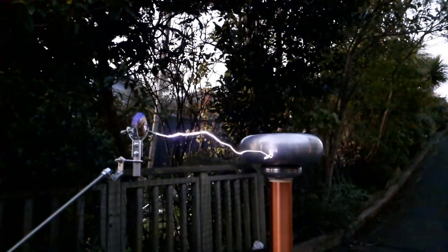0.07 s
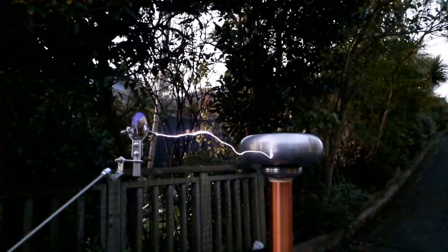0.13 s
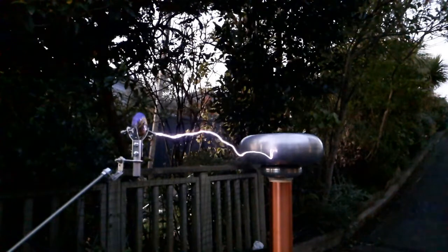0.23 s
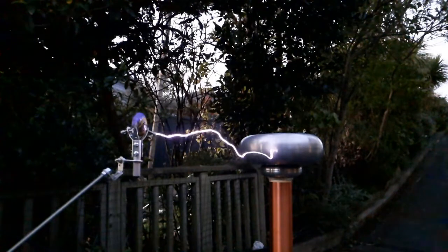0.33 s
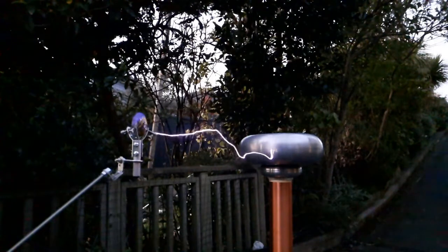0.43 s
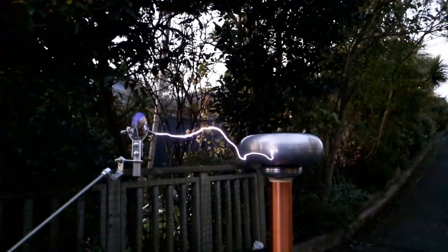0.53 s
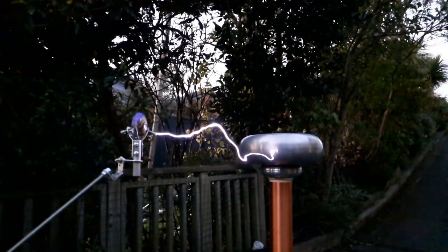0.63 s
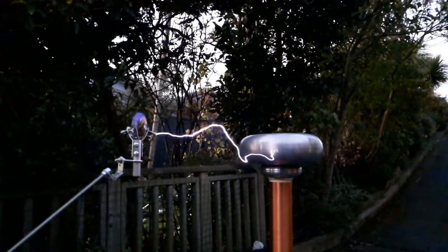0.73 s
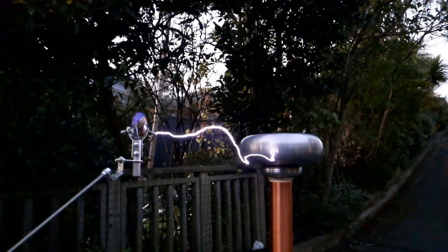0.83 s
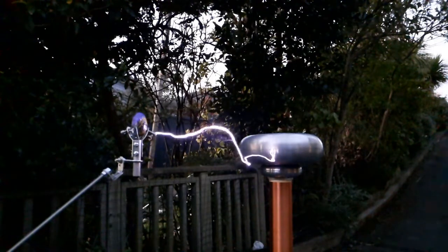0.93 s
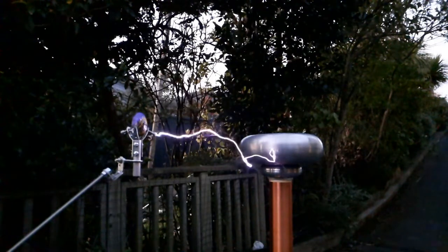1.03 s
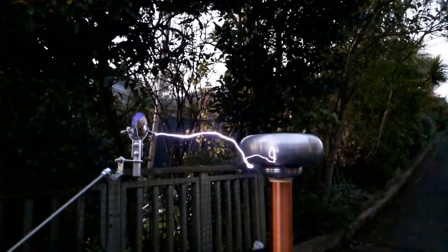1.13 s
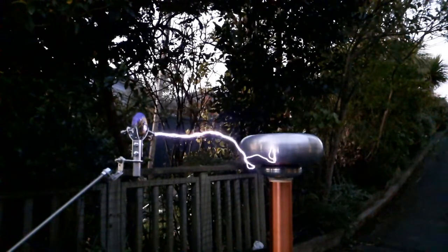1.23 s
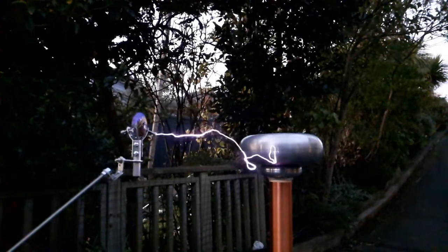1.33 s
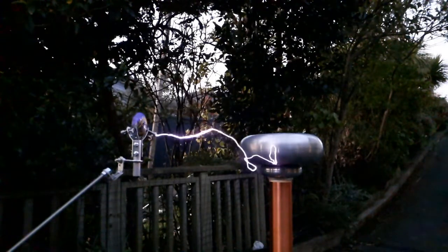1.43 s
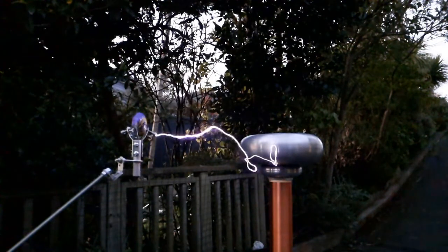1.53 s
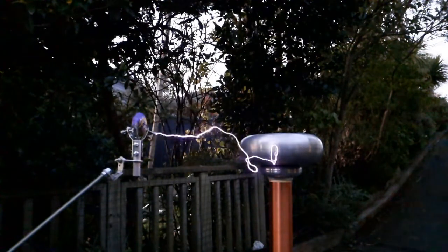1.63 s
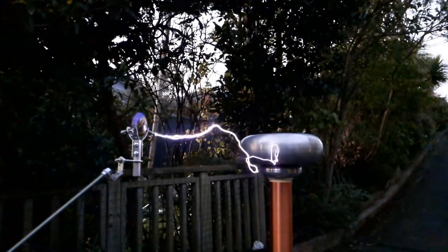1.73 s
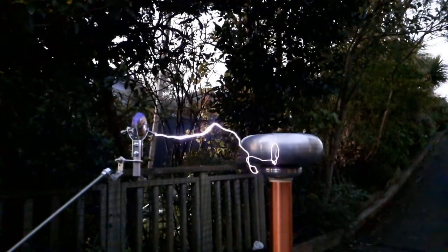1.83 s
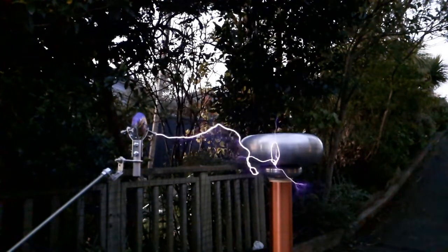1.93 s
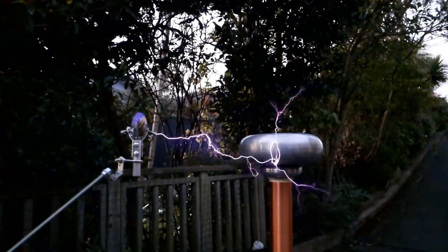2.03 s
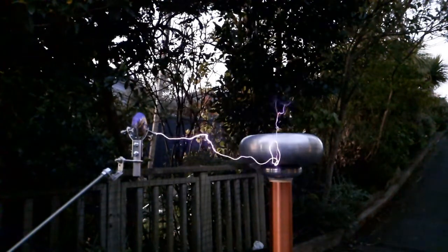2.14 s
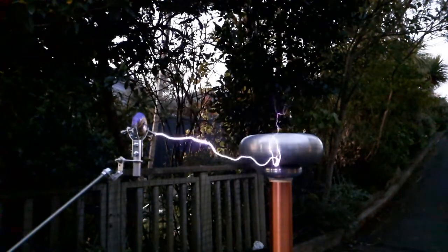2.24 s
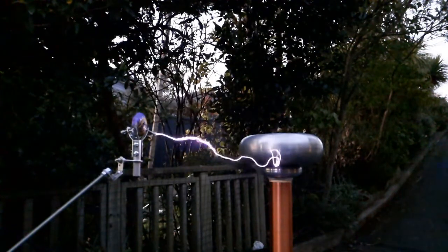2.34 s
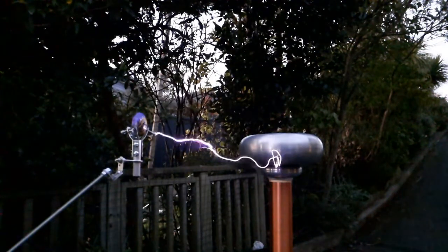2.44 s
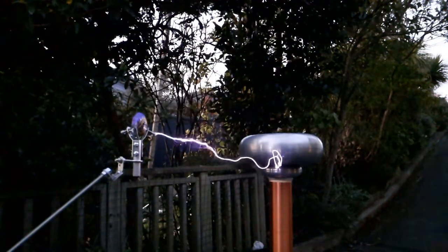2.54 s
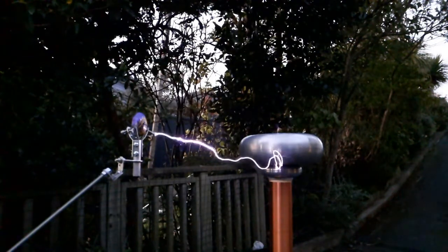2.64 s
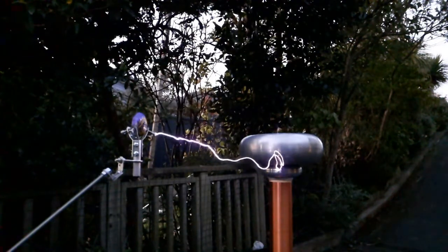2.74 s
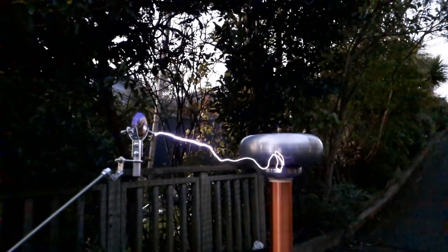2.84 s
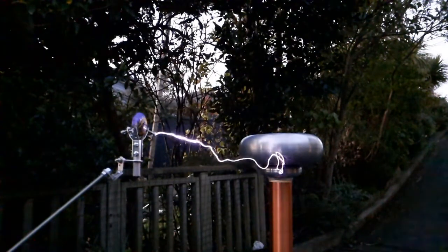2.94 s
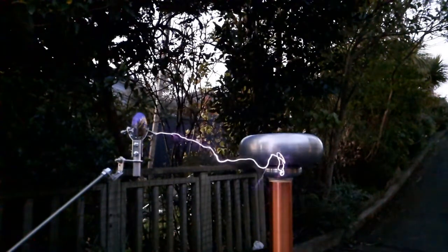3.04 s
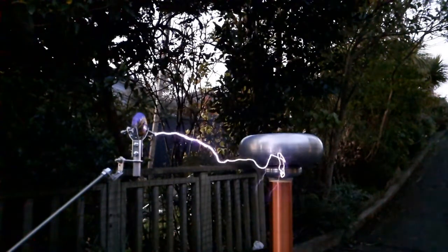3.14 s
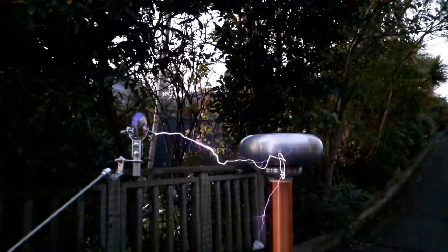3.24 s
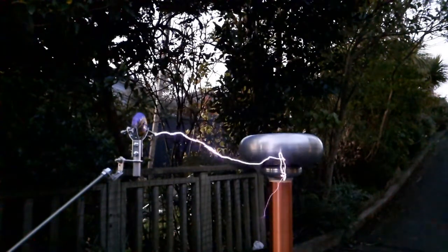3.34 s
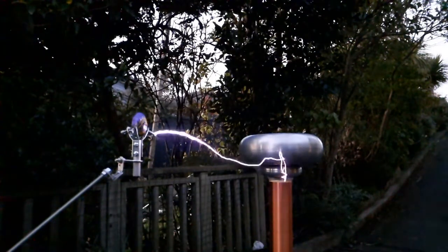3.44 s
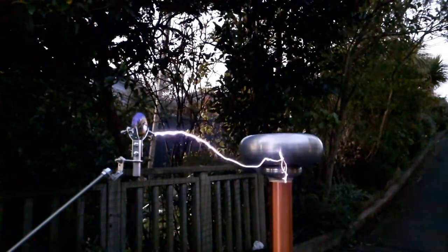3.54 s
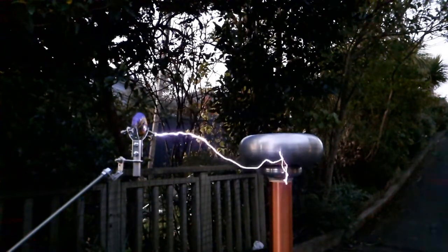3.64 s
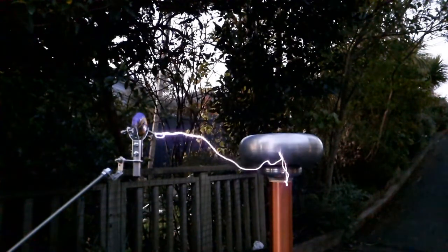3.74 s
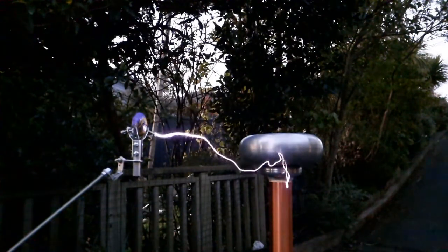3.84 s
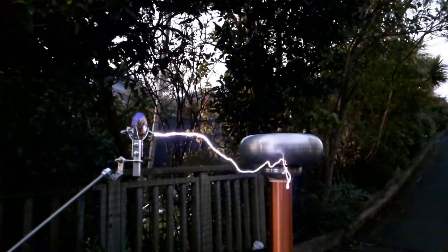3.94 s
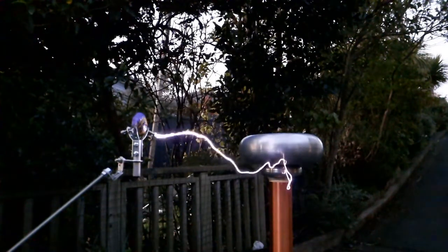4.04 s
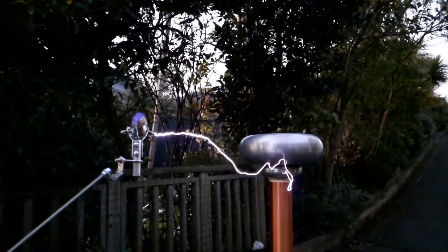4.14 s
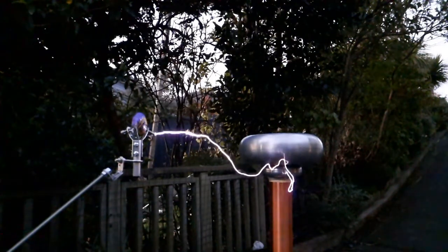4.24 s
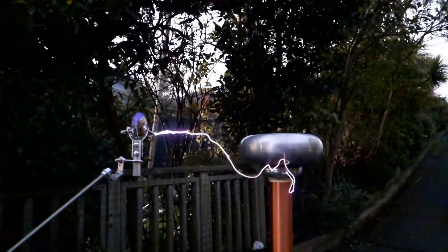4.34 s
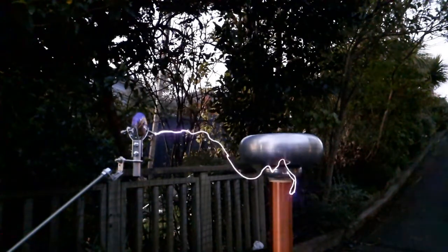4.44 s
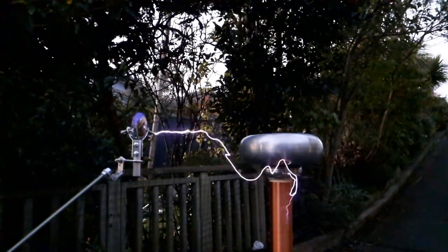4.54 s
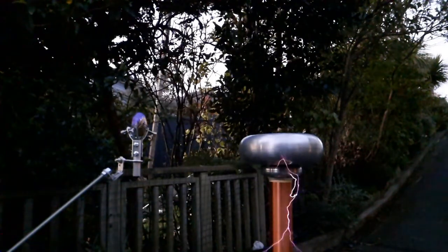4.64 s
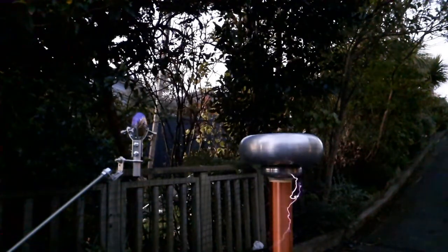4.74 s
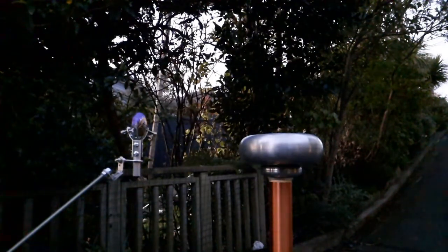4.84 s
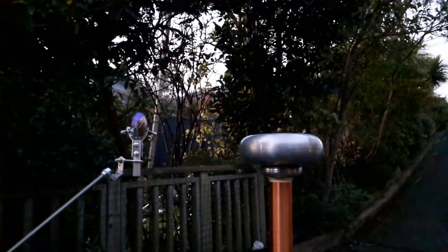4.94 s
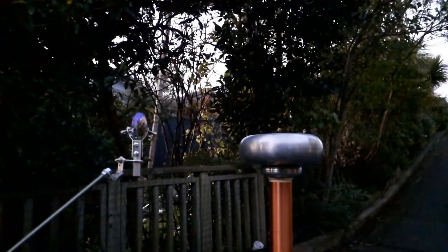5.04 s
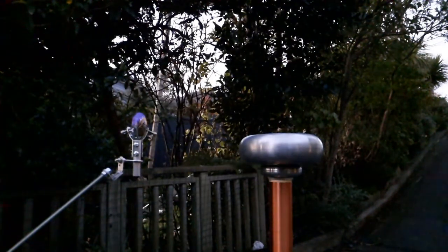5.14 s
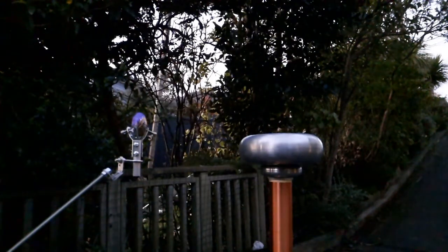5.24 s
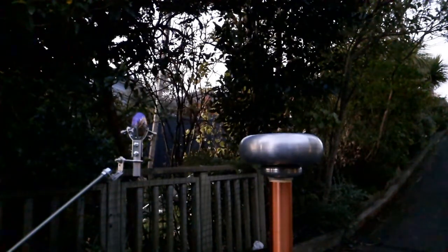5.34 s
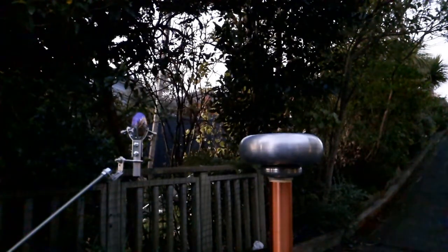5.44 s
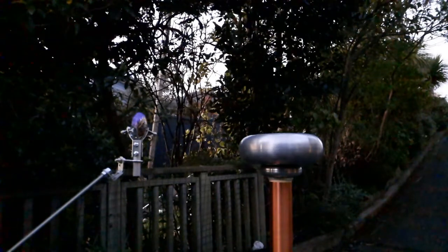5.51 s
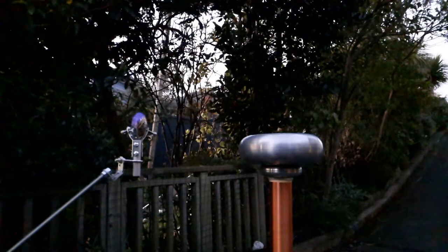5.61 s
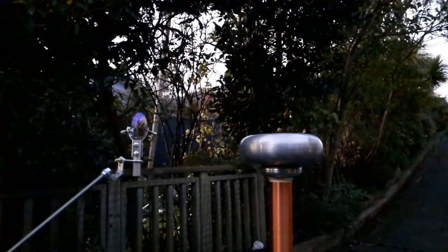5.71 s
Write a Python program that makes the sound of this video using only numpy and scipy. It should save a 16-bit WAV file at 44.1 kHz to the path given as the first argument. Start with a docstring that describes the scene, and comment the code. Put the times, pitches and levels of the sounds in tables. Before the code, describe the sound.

A loud, gritty, low electric buzz of rapid even crackles in slowed playback rattles outdoors, then dies near five seconds into a faint echoing tail.

```python
"""A high-voltage coil in a garden, heard in slow motion, over a steady outdoor murmur.
From the start, near-even sparks crack as bursts of ticks; each one shoves two microphone capsules.
Meanwhile a metal part swells near 1 kHz, arc jumps knock, and echoes hum on multiples of the spark rate.
The arc dies away by 4.95 s and the garden echoes on.
The slowed playback holds each sample, so mirror images of the sound fill the treble."""
import sys
import numpy as np
from scipy import signal
from scipy.fft import rfft, irfft, next_fast_len
from scipy.io import wavfile
from scipy.ndimage import map_coordinates

SR = 44100
rng = np.random.default_rng(int(sys.argv[2]) if len(sys.argv) > 2 else 0)


def persist_wave(psi):
    """Save psi, clipped to +-1, as 16-bit WAV."""
    counts = np.round(np.clip(psi, -1, 1) * 32767).astype(np.int16)
    wavfile.write(sys.argv[1], SR, np.atleast_2d(counts).T)


N = 254456
SPARK_HZ, FIRST_S, OFF_S = 53.6144, 0.0088, 4.95


def undb(db):
    """Decibels to amplitude factor."""
    return 10 ** (np.asarray(db) / 20)


def colour(x, points):
    """Shapes the spectrum along (freq_hz, gain_db) points, log-frequency interpolation."""
    n = next_fast_len(x.shape[-1] + 4096)
    freq_hz, gain_db = np.transpose(points)
    bin_hz = np.arange(n // 2 + 1) * SR / n
    gain = undb(np.interp(np.log(bin_hz + 1), np.log(freq_hz), gain_db))
    return irfft(rfft(x, n) * gain, n)[..., :x.shape[-1]]


def ring(x, freq_hz, t60_s):
    """One exponentially decaying mode driven by x: a complex one-pole resonator."""
    pole = np.exp(2j * np.pi * freq_hz / SR - np.log(1000) / (t60_s * SR))
    return signal.lfilter([1], [1, -pole], x).imag


def bump(rise_ms, fall_ms, size=1400):
    """Quick rise and exponential fall, peak 1."""
    ms = np.arange(size) * 1000 / SR
    y = (1 - np.exp(-ms / rise_ms)) ** 2 * np.exp(-ms / fall_ms)
    return y / y.max()


def clicks(times_s, sizes):
    """A click of the given size at each time."""
    return np.bincount(np.clip(times_s * SR, 0, N - 1).astype(int), sizes, N)


def overlay(times_s, bursts):
    """Sums one burst per row, each starting at its own time."""
    where = (times_s * SR).astype(int)[:, None] + np.arange(bursts.shape[1])
    return np.bincount(where.ravel(), bursts.ravel(), N)[:N]


def drift(shape, keep, order=2):
    """Random rows of spread 1, each correlated by `keep` with the row `order` places before."""
    fresh = rng.standard_normal((shape[0] + 60,) + shape[1:])
    feedback = np.r_[1, np.zeros(order - 1), -keep]
    rows = signal.lfilter([np.sqrt(1 - keep ** 2)], feedback, fresh, axis=0)
    return rows[60:]  # drop the settling rows


# Spectral shape of the quiet garden: freq_hz, relative_density_db
AIR_SPECTRUM = [(35, -40), (60, -24), (123, -20), (152, -10), (296, -19), (648, -15.5), (1810, -19.5),
                (2950, -14), (3840, -49), (6490, -120)]
AIR_RMS_DB = -51.5


def air():
    """Steady outdoor murmur: coloured noise, independent at each capsule."""
    x = colour(rng.standard_normal((2, N)), AIR_SPECTRUM)
    return undb(AIR_RMS_DB) * x / np.sqrt(np.mean(x ** 2))


# Colour of the quick echoes: freq_hz, gain_db
NEAR_ECHO_COLOUR = [(40, -24), (160, -16), (300, -15), (500, -14), (750, -9), (1000, -2.5), (1300, -0.5),
                    (2300, -7), (2700, -5.5), (2950, -2.5)]
# Colour of the long echoes: freq_hz, gain_db
FAR_ECHO_COLOUR = [(40, -36), (160, -25), (300, -9), (500, -4.5), (750, 6), (1000, 7.5), (1300, 8),
                   (2300, -20), (2950, -14)]
NEAR_T60_S, FAR_T60_S = 1.15, 3.2


def garden(x):
    """Fence and hedges answer quickly, far walls and trees leave a faint long tail: noise convolution."""
    t = np.arange(int(1.5 * SR)) / SR
    near = undb(-37 - 60 * t / NEAR_T60_S)
    far = undb(-51.5 - 60 * t / FAR_T60_S)
    noise = rng.standard_normal(len(t)) * (1 - np.exp(-t / 0.0033))
    tail = colour(noise * near, NEAR_ECHO_COLOUR) + colour(noise * far, FAR_ECHO_COLOUR)
    earlier = x[:int(30 * SR / SPARK_HZ)]  # 30 spark periods still echoing at the start
    return signal.fftconvolve(np.r_[earlier, x], tail)[len(earlier):len(earlier) + N]


# Echo pile-up on multiples of the spark rate, before beat size and swell:
# multiple, level_db, t60_s, arrival_delay_s
HUM_PARTIALS = [(1, -61, 2.4, 0.33), (2, -55, 1, 0.66), (3, -45.5, 0.44, 0.), (4, -49, 1.5, 0.017),
                (5, -43.5, 1.73, 0.041), (6, -55, 1.2, 0.31), (7, -44.5, 1.1, 0.25), (8, -47, 0.9, 0.37),
                (9, -55.5, 1.8, 0), (10, -58.5, 1.2, 0.36), (11, -67, 1.9, 0.48)]
HUM_SWELL_DB, HUM_WAVER_RAD = 3, 0.5  # spreads
HUM_RIGHT_LAG_S = 0.004


def hum(times_s, sizes, side):
    """Echoes of regular pushes sum to harmonics that arrive late, waver and die slowly; later on the right."""
    grid_s = np.arange(int(N / SR * SPARK_HZ) + 2) / SPARK_HZ
    waver = drift((len(grid_s), len(HUM_PARTIALS), 2), 0.82, order=1).T
    t = np.arange(N) / SR
    late_s = t - FIRST_S - HUM_RIGHT_LAG_S * side
    out = 0
    for (multiple, level_db, t60_s, delay_s), swell, turn in zip(HUM_PARTIALS, *waver):
        keep = 1000 ** (-1 / (t60_s * SPARK_HZ))
        fed = np.interp(grid_s - delay_s, times_s, sizes, right=0)
        stored = signal.lfilter([1 - keep], [1, -keep], fed, zi=[keep * fed[0]])[0]
        level = stored * undb(level_db + HUM_SWELL_DB * swell) * np.exp(1j * HUM_WAVER_RAD * turn)
        carrier = np.exp(2j * np.pi * round(multiple) * SPARK_HZ * late_s)
        out = out + (np.interp(t, grid_s, level) * carrier).imag
    return out


# Spells of strong ring near 1 kHz, level before spark strength and scatter:
# start_s, end_s, first_hz, last_hz, level_db
RING_SPELLS = [(0, 0.362, 1065, 1100, -25), (0.43, 0.894, 1064, 1075, -25.5),
               (0.956, 1.85, 1071, 1075, -21), (3.44, 3.65, 1008, 1046, -23.5),
               (3.857, 3.964, 1088, 1060, -26), (4.09, 4.607, 1068, 1106, -20)]
RING_REST_DB, RING_FADE_DB_PER_S = -50, 19  # floor at strength 0 dB; fade outside a spell


def metal(times_s, arc_db, slip_s, side):
    """A metal part near 1 kHz swells and fades after each spark, with random level and timing."""
    start_s, end_s, first_hz, last_hz, level_db = np.transpose(RING_SPELLS)
    now_s = times_s[:, None]
    pitch_hz = first_hz + (last_hz - first_hz) * np.clip((now_s - start_s) / (end_s - start_s), 0, 1)
    away_s = np.maximum(0, np.maximum(start_s - now_s, now_s - end_s))
    spell_db = level_db - RING_FADE_DB_PER_S * away_s
    tone_db = np.maximum(spell_db.max(axis=1) + np.minimum(arc_db, 0), RING_REST_DB + arc_db)
    chance = rng.standard_normal((len(times_s), 2)).T
    onset_s = times_s + 0.0012 * side + 4e-5 * chance[0] + slip_s
    env = bump(2.2, 4.8)
    t = np.arange(len(env)) / SR
    loudest_hz = pitch_hz[np.arange(len(times_s)), spell_db.argmax(axis=1)]
    phase = 2 * np.pi * loudest_hz[:, None] * t
    # second mode about an octave up
    tone = env * np.sin(phase) + undb(-3.5) * bump(1.0, 10.3) * np.sin(2.1 * phase)
    scatter_db = 1.3 * chance[1]
    return overlay(onset_s, undb(tone_db + scatter_db)[:, None] * tone)


# Arc jumps to a new path, level at the right capsule before JUMP_GAIN_DB:
# time_s, level_db, pitch_hz, left_minus_right_db
ARC_JUMPS = [(0.026, -28, 313, 11), (0.045, -23, 353, 0.0), (0.063, -21, 444, -10), (0.101, -23, 307, 3),
             (0.12, -25, 369, 8), (0.157, -19, 480, -2.0), (0.215, -23, 374, -11), (0.232, -26, 460, 0.0),
             (0.605, -27, 308, -0.5), (0.792, -21, 417, 2), (0.903, -20, 441, -2), (0.923, -18, 790, 1.0),
             (1.145, -28, 431, 1), (1.183, -21, 439, 2.0), (1.557, -17, 423, -7), (1.67, -23, 570, -13),
             (1.686, -20.5, 420, -4), (1.706, -23, 430, 3), (1.742, -18, 444, 4), (2.078, -26, 443, 7),
             (2.097, -18, 740, -1.0), (2.267, -19, 396, -3.0), (2.283, -16, 724, 5), (2.304, -21, 624, -9),
             (2.321, -13.5, 439, -1), (2.414, -20.5, 314, 3), (2.452, -17, 725, -4), (2.527, -26, 347, 2),
             (2.601, -19, 510, -0.5), (2.825, -20, 327, 6), (3.05, -24, 320, -1.0), (3.106, -27, 330, -1.5),
             (3.197, -25, 305, -4), (3.405, -20, 600, 0.5), (3.424, -21, 363, 4), (3.443, -18, 336, 0),
             (3.458, -29, 487, -3), (3.571, -17.5, 592, 0), (3.61, -25, 482, -6), (3.685, -26, 455, -1),
             (3.701, -23, 480, 4), (3.738, -24, 298, -2.0), (3.758, -21, 328, 1), (3.775, -19, 398, 3),
             (3.813, -24, 428, 0), (3.98, -19, 565, 0.0), (4.185, -16, 398, 0), (4.204, -23, 345, 1.5),
             (4.319, -23, 441, -1.0), (4.371, -16, 676, -5), (4.39, -20, 697, 0), (4.467, -20, 325, -3.0),
             (4.484, -23, 312, -2.5), (4.522, -17.5, 320, 4), (4.595, -16, 390, -1), (4.615, -23, 310, -5),
             (4.635, -22, 480, 7)]
JUMP_CYCLES, JUMP_GAIN_DB = 1.3, 1


def jumps(times_s, side):
    """Arc jump: a hollow knock, a sine of a few cycles on the nearest spark."""
    out = np.zeros(N + 2000)
    t = np.arange(2000) / SR
    for jump_s, level_db, pitch_hz, pan_db in ARC_JUMPS:
        nearest_s = times_s[np.abs(times_s - jump_s).argmin()]
        at = int((nearest_s + 0.00028 * side) * SR)
        cycles = pitch_hz * t
        x = cycles / JUMP_CYCLES
        knock = x * np.exp(1 - x) ** 2 * np.sin(2 * np.pi * cycles)
        out[at:at + 2000] += undb(JUMP_GAIN_DB + level_db + pan_db * (1 - side)) * knock
    return out[:N]


def pops(times_s, sizes):
    """Short snaps of random size and sign: the slope of a pressure bump."""
    hits = clicks(times_s + 0.0009, sizes)
    return signal.fftconvolve(hits, np.gradient(bump(0.5, 0.75, size=300)) * 20)[:N]


# Fence return of pops and knocks, one row per capsule: delay_ms, level_db
FENCE_ECHO = [(4.49, -10), (3.05, -2)]


def fence(x, side):
    """The fence returns a sound once: a delayed, weaker copy."""
    delay_ms, level_db = FENCE_ECHO[side]
    return x + undb(level_db) * np.roll(x, int(delay_ms * SR / 1000))


# Pressure push of a unit spark, one list per capsule: delay_ms, rise_ms, fall_ms, level_db, sign
SPARK_PUSH = [
    [(0.0, 0.3, 1.6, -18.5, 1)],
    [(0.0, .4, 0.4, -25, 1), (1.0, 0.6, 5.5, -20.5, -1)],
]
# Deepest shoves, level midway between capsules: time_s, level_db, left_minus_right_db
DEEP_THUMPS = [(0.047, -31, 12), (0.494, -15, -3), (0.588, -23, -2), (0.923, -22, -1), (0.998, -39, 1),
               (1.296, -30, -8), (1.557, -23, 9), (1.781, -20, 8), (1.837, -13, -7), (2.117, -22, -3),
               (2.173, -29, -1.5), (2.397, -29, 8), (2.621, -18, 14), (2.826, -9.5, 3), (2.882, -18, -2),
               (3.18, -20, -4), (3.441, -16, -8), (3.572, -23, -4), (3.87, -13, -12), (4.057, -12, -6),
               (4.131, -18, 17), (4.672, -13.5, -3), (4.691, -18, -10)]
OPPOSED = 0.63  # power share of the random shove that drives the capsules opposite ways


def shoves(times_s, sizes, loose, common, side):
    """Each spark pushes the capsule; a random part and the deep thumps set it swinging at 42 Hz."""
    chance = rng.standard_normal((len(times_s), 2)).T
    strength = 1 + 0.35 * chance[0] + 0.35 * drift(times_s.shape, 0.8, order=1)
    push = 0
    for delay_ms, rise_ms, fall_ms, level_db, sign in SPARK_PUSH[side]:
        hits = clicks(times_s + delay_ms / 1000, sizes * strength)
        push = push + sign * undb(level_db) * signal.fftconvolve(hits, bump(rise_ms, fall_ms))[:N]
    thump_s, thump_db, pan_db = np.transpose(DEEP_THUMPS)
    nearest_s = times_s[np.abs(thump_s[:, None] - times_s).argmin(axis=1)]
    thumps = clicks(nearest_s, undb(thump_db + pan_db * (0.5 - side)))
    stray = np.sqrt(OPPOSED) * common * (-1) ** side + np.sqrt(1 - OPPOSED) * chance[1]
    kicks = clicks(times_s, loose * stray) - thumps
    shove = signal.fftconvolve(kicks, bump(0.44, 7.4, size=3000))[:N]
    swing = undb(-45) * ring(shove, 42, 0.22)
    low_cut = signal.butter(2, 24, "high", fs=SR, output="sos")
    return signal.sosfilt(low_cut, push + shove + swing)


def ticks(shape, kept=0.45):
    """Every kink of the arc sends a tick: noise, part kept over a few sparks and part new each time."""
    return np.sqrt(kept) * drift(shape, 0.8) + np.sqrt(1 - kept) * rng.standard_normal(shape)


# Crack envelope before tightness, one row per capsule: rise_ms, fall_ms, fence_delay_ms, fence_db
CRACK_FRONT = [(1.3, 1.3, 4.0, -7), (1.2, 1.4, 2.6, -5)]
# Crack colour: freq_hz, gain_db
CRACK_COLOUR = [(40, 8.5), (300, -3.5), (600, -1.5), (950, -8), (1260, -14.5), (1600, -1), (2450, 0),
                (2700, 5.5), (2950, 3.5)]
# Gain of the crack's treble above 2 kHz: time_s, gain_db
CRACK_TREBLE = [(0, -0.18), (0.45, 1.5), (0.7, -3), (1.1, -2), (1.45, 0.5), (1.7, 2), (2.0, -3), (2.3, -1),
                (2.6, 0.5), (3.0, 1), (3.4, 0), (3.7, -1.5), (4.0, 2), (4.3, 0), (4.7, 4.5)]
WALL_MS, WALL_DB = 9.6, -12
ALIKE = 0.877  # power share of ticks common to both capsules


def cracks(times_s, sizes, tight, both, side):
    """Tick bursts, some tight and some drawn out, partly shared by the capsules, returned by fence and wall."""
    rise_ms, fall_ms, fence_ms, fence_db = CRACK_FRONT[side]
    env = bump(rise_ms, fall_ms)
    env = np.hypot(env, undb(fence_db) * np.roll(env, int(fence_ms * SR / 1000)))
    wall = np.roll(bump(2 * rise_ms, 2 * fall_ms), int(WALL_MS * SR / 1000))
    env = np.hypot(env, undb(WALL_DB) * wall)
    shape = env ** tight[:, None]
    # equal energy at any tightness
    shape = shape * np.sqrt(np.sum(env ** 2) / np.sum(shape ** 2, axis=1))[:, None]
    burst = np.sqrt(ALIKE) * both + np.sqrt(1 - ALIKE) * ticks(both.shape)
    y = colour(overlay(times_s, sizes[:, None] * burst * shape), CRACK_COLOUR)
    high_pass = signal.butter(2, 2000, "high", fs=SR, output="sos")
    treble = signal.sosfiltfilt(high_pass, y)
    treble_gain = undb(np.interp(np.arange(N) / SR, *np.transpose(CRACK_TREBLE)))
    return y + (treble_gain - 1) * treble


# Arc strength before wander; push and pop relative to strength: time_s, strength_db, push_db, pop_db
ARC_STRENGTH = [(0.0, 8.5, 11, -15), (0.101, 2, 2.5, -40), (0.35, -3, 13, -31), (0.9, 1.5, 2.5, -15),
                (1.2, 1.5, 13, -67), (1.45, -1.5, 7.5, -46), (1.7, 7, 0.5, -16), (1.9, -4.5, 5.5, -18),
                (2.2, 4, -1.5, -23.5), (2.6, 2.5, 5.5, -10.5), (2.751, 2.5, -0.5, -22),
                (3.2, 1, 9.5, -14.5), (3.45, 5.5, -10, -17), (3.8, 3, 6, -17), (4.0, 6, -9, -40),
                (4.2, 2.5, 7, -12), (4.5, 5, 1.5, -40), (4.68, -4, 14, -4.5), (4.74, -9, -11, -14),
                (4.891, -17, -27, -23), (4.95, -58, -9, -34)]
WANDER_DB = 2.2  # spread of the slow strength wander
CRACK_DB, HUM_DB, LOOSE_DB = -5, 3, -27.5  # at strength 0 dB
STAGGER_MS, RIGHT_LAG_MS = 0.45, 0.6
TIGHT_SPREAD = 0.18  # spark to spark, natural log


def scene():
    """One wandering arc drives every source at both capsules; the murmur lies under all."""
    k = np.arange(int((OFF_S - FIRST_S) * SPARK_HZ))
    chance = rng.standard_normal((len(k), 4)).T
    beat_s = FIRST_S + k / SPARK_HZ
    # the gap fires alternately early and late
    times_s = beat_s - STAGGER_MS / 1000 * (1 - k % 2) + 2e-5 * chance[0]
    # the pressure push keeps an even beat
    even_s = beat_s - 0.0001 + 6e-5 * chance[0]

    point_s, *columns = np.transpose(ARC_STRENGTH)
    arc_db, push_db, pop_db = (np.interp(times_s, point_s, c) for c in columns)
    arc_db = arc_db + WANDER_DB * drift(k.shape, 0.75, order=1)
    sizes = undb(arc_db + CRACK_DB + 0.7 * chance[1])
    pushes = undb(arc_db + push_db)
    loose = undb(LOOSE_DB + 0.89 * arc_db + np.minimum(push_db + 13, 0))
    snaps = pops(times_s, undb(arc_db + pop_db) * np.clip(chance[2], -2, 2))
    beats = undb(arc_db + HUM_DB)

    both = ticks((len(k), 1400))
    # the arc wanders, so the lag between capsules does too
    lag_s = (RIGHT_LAG_MS + 0.12 * drift(k.shape, 0.93, order=1)) / 1000
    slip_s = 2e-4 * drift(k.shape, 0.8)
    tight = 1.3 * np.exp(TIGHT_SPREAD * drift(k.shape, 0.5, order=1))

    out = []
    for side in range(2):  # left, right
        crack = cracks(times_s - 0.0006 + side * lag_s, sizes, tight, both, side)
        push = shoves(even_s, pushes, loose, chance[3], side)
        knocks = fence(np.roll(snaps, 30 * side) + jumps(times_s, side), side)
        tone = metal(times_s, arc_db, slip_s, side)
        echoes = hum(times_s, beats, side) + undb(-0.8 * side) * garden(crack)
        out.append(crack + tone + knocks + push + echoes)
    return np.array(out) + air()


HOLD_HZ, BAND_HZ, TOP_HZ = 12003.86, 2958, 15100
EDGE_HZ, EDGE_DB, EDGE_T60_S = 3001, -68, 0.78  # faint ring at the band edge


def record(dry):
    """Peaks are rounded and the band limited; each slow sample is held until the next, then the top is cut."""
    soft = np.tanh(2.2 * dry) / 2.2
    band_limit = signal.ellip(10, 0.5, 65, BAND_HZ, fs=SR, output="sos")
    band = signal.sosfilt(band_limit, soft)
    band = band + undb(EDGE_DB) * ring(soft, EDGE_HZ, EDGE_T60_S)
    at = np.floor(np.arange(N) * HOLD_HZ / SR) * SR / HOLD_HZ
    held = np.array([map_coordinates(c, [at], order=3, mode="nearest") for c in band])
    top_cut = signal.ellip(8, 0.2, 70, TOP_HZ, fs=SR, output="sos")
    return signal.sosfilt(top_cut, held)


dry = scene()
out = record(dry)
persist_wave(out)
```